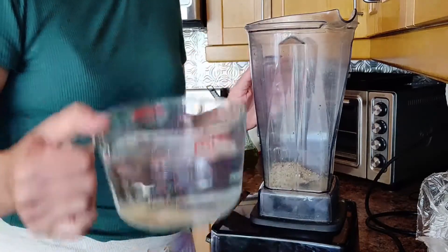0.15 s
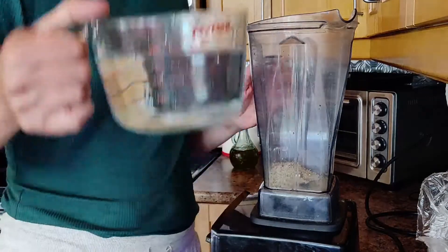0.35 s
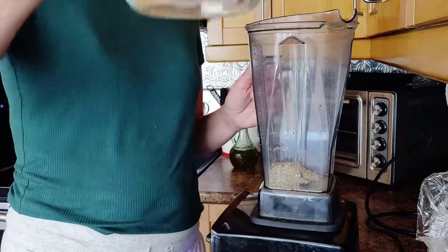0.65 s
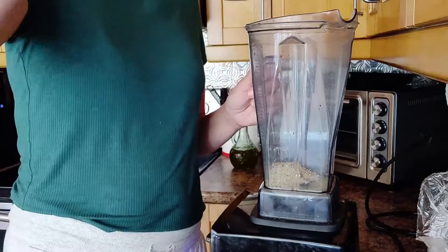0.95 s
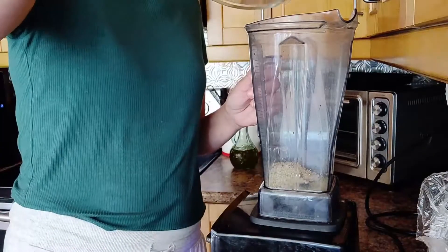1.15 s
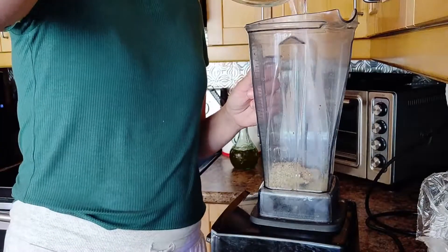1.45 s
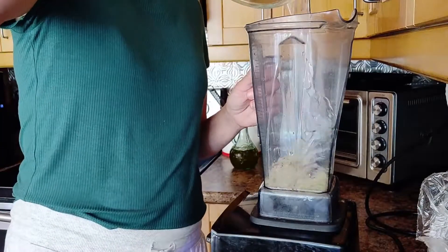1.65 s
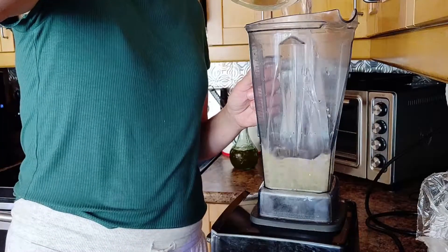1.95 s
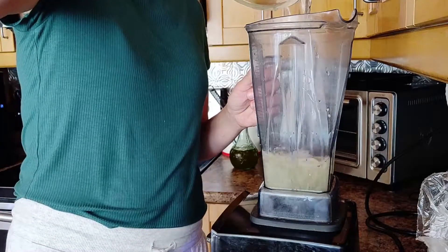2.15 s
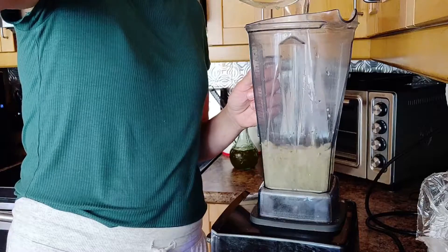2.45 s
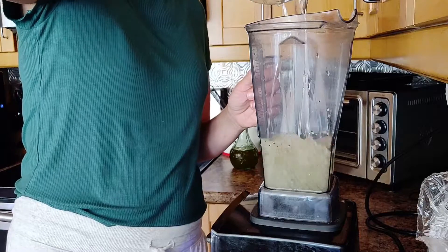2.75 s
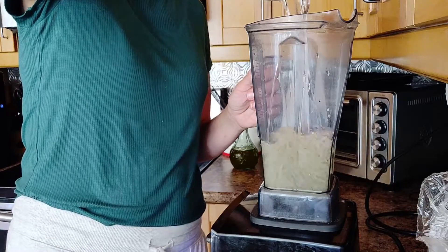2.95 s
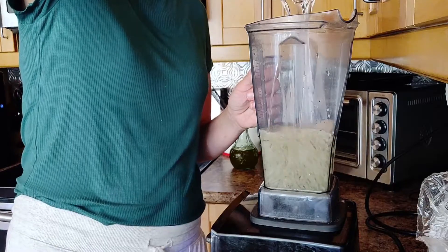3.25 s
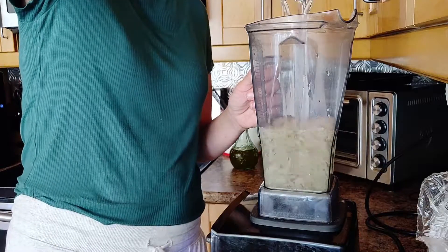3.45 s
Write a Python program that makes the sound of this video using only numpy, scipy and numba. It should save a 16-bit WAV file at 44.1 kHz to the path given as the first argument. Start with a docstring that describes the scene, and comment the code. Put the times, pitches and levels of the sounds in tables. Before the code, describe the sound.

In a small kitchen, close to the microphone, a measuring jug clunks off the counter with faint rustles. After a pause, water pours into a plastic blender jar with bright splatter and bubbling, settling into a softer, hollow stream.

```python
"""A small kitchen, heard close up on a phone with a bright treble peak. A measuring jug knocks and
scrapes as it is lifted off the counter, and faint rustles follow. From 1.5 s water pours into a tall
plastic jar over dry grain: drops spatter, bubbles fizz and ring the jar. The air pocket under the
stream glugs lower as it deepens, then the air column above the rising water hums through."""
import sys
import numpy as np
from scipy import signal
from scipy.fft import rfft, irfft
from scipy.io import wavfile
from scipy.ndimage import uniform_filter1d
from numba import njit

SR = 44100
rng = np.random.default_rng(int(sys.argv[2]) if len(sys.argv) > 2 else 0)


def pcm_store(signal):
    """Save signal as 16-bit PCM."""
    levels = np.round(np.clip(np.atleast_2d(signal), -1, 1) * 32767)
    wavfile.write(sys.argv[1], SR, levels.astype(np.int16).T)


N = 158760
T = np.arange(N) / SR

# Strength of the stream's layers: time_s, spatter_db, top_treble_db, fizz_db, larger_bubbles_db, churn_db
POUR = [(1.495, -64, -75, -74, -80, -70), (1.51, -50, -54.5, -42, -68, -61),
        (1.553, -30.5, -54, -50.5, -81, -54), (1.558, -23.5, -42, -25, -60, -45),
        (1.6, -18, -45, -32.5, -46, -52.5), (1.68, -16, -37, -21, -38, -50),
        (1.75, -16.5, -38.5, -30, -52.5, -48), (1.82, -14.5, -36, -20.5, -34, -48.5),
        (1.86, -18.5, -42, -20, -34.5, -65), (1.92, -20, -48, -17.5, -23.5, -43.5),
        (1.96, -24, -57, -21.5, -34.5, -46), (2.0, -16, -50, -22, -27, -45.5),
        (2.04, -25, -56, -23.5, -22, -61), (2.1, -29.5, -51, -23, -23.5, -58),
        (2.17, -28, -50.5, -34, -37.5, -53), (2.43, -30, -57, -32.5, -42, -44),
        (2.6, -30, -57, -33.5, -38, -50.5), (2.8, -34.5, -62, -37, -43, -45),
        (2.94, -34.5, -61.5, -32.5, -41, -45.5), (3.1, -38.5, -64, -39.5, -48, -52.5),
        (3.32, -30, -56, -32, -37.5, -43.5), (3.39, -33, -61, -39.5, -43, -46),
        (3.6, -31, -62, -39.5, -49.5, -49.5)]


def undb(db):
    return 10 ** (np.asarray(db) / 20)


def unit(x):
    return x / np.sqrt(np.mean(x ** 2))


def curve(table, column):
    """One column of a table, interpolated over time."""
    return np.interp(T, np.array(table)[:, 0], np.array(table)[:, column])


def colour(x, points, envelope=1):
    """Causal filter through (Hz, dB) points, falling steeply outside them; rms follows the envelope."""
    hz, db = np.array(points).T
    log_hz = np.log(np.maximum(np.arange(2049) * SR / 4096, 5))
    outside = np.maximum(np.log(hz[0]) - log_hz, 0) + np.maximum(log_hz - np.log(hz[-1]), 0)
    gain_db = np.interp(log_hz, np.log(hz), db) - 40 * outside
    cepstrum = irfft(gain_db * np.log(10) / 20)
    cepstrum[1:2048] *= 2  # fold to minimum phase
    cepstrum[2049:] = 0
    impulse = unit(irfft(np.exp(rfft(cepstrum)))) / 64
    return signal.fftconvolve(unit(x) * envelope, impulse)[:N]


def walk(rate_hz):
    """Glide between random values, rate_hz of them a second; rms 1."""
    hold = int(SR / rate_hz)
    return unit(uniform_filter1d(np.repeat(rng.standard_normal(N // 20), hold)[:N], hold))


def sizes(chance, spread_db):
    """Turn uniform draws into amplitudes: mostly small, a few large, none huge."""
    return undb(spread_db * np.minimum(-np.log(chance), 5))


def clicks(per_s, spread_db):
    """Random one-sample impacts of very uneven size."""
    when, side, size = rng.random((int(per_s * N / SR), 3)).T
    return np.bincount((when * N).astype(int), np.sign(side - .5) * sizes(size, spread_db), N)


@njit
def bandpass(x, hz, q):
    """State-variable band-pass with a moving centre."""
    y, band_state, low_state = np.empty(len(x)), 0., 0.
    for i in range(len(x)):
        g = np.tan(np.pi * hz[i] / SR)
        band = (band_state + g * (x[i] - low_state)) / (1 + g * (g + 1 / q))
        band_state = 2 * band - band_state
        low_state += 2 * g * band
        y[i] = band / q
    return y


def room_tone():
    """The kitchen's faint, slightly wavering background noise."""
    # Background spectrum: frequency_hz, gain_db
    spectrum = [(15, -29), (40, -32), (152, -1), (511, -6.5), (652, -5), (745, -9), (925, -10.5),
                (1390, -15), (1670, -18), (5050, -13), (8200, -28), (13000, -32.5), (15700, -17)]
    return colour(rng.standard_normal(N), spectrum) * undb(-65.5 + walk(6.97))


def jug_knocks():
    """A few quick contacts ring the glass jug and the counter."""
    # Modes of jug and counter: pitch_hz, level_db
    modes = [(572, -1.5), (1190, -7), (1750, -9), (2347, -8), (2740, -4)]
    # Contacts: start_s, level_db
    contacts = [(.169, -31), (.174, -28), (.179, -28), (0.189, -40), (.222, -48)]
    t60_s, softness_s = .045, 0.00061
    hits = np.zeros(N)
    for start_s, db in contacts:
        hits[int(start_s * SR)] = undb(db)
    age = T[:SR // 2]
    ring = sum(undb(db) * np.sin(2 * np.pi * hz * age) for hz, db in modes)
    ring *= 1000. ** (-age / t60_s) * (1 - np.exp(-age / softness_s))
    return signal.fftconvolve(hits, ring)[:N]


def scrape_and_rustles():
    """The jug scrapes briefly on the counter; faint rustles with the same gritty tone follow."""
    # Scrape spectrum: frequency_hz, gain_db
    spectrum = [(59, -67), (220, -22), (582, -7), (904, -14.5), (1700, -15.5), (1920, -22.5), (2750, -20),
                (3530, -23.5), (5840, -11.5), (8170, -43.5), (15000, -57)]
    # Faint rustles: centre_s, level_db, half_width_s
    rustles = [(0.628, -66, 0.036), (0.766, -60, 0.033), (0.931, -64.5, 0.033)]
    start_s, attack_s, contact_s = 0.1648, 0.016, 0.065
    fade_db_per_s, release_db_per_s = 112, 450
    age = T - start_s
    scrape_db = -31.5 - fade_db_per_s * age - release_db_per_s * np.maximum(age - contact_s, 0)
    envelope = np.clip(age / attack_s, 0, 1) * undb(scrape_db)
    envelope += sum(undb(db) * np.exp(-((T - centre_s) / width_s) ** 2) for centre_s, db, width_s in rustles)
    return colour(clicks(per_s=9000, spread_db=3.7), spectrum, envelope)


def splat_envelope():
    """Louder splats gather (the big ones most), crack and crumble away."""
    # Splats: peak_s, strength_db
    splats = [(1.5107, -30.5), (1.558, -23), (1.67, -9.5), (1.7245, -14), (1.758, -4), (1.83, -24),
              (1.9106, -10), (1.9748, -1), (2.0034, -12), (2.2393, -22), (2.388, -21.5), (2.5408, -14),
              (2.7813, -22), (2.826, -20.5), (2.9404, -23), (3.0445, -27), (3.178, -26), (3.1917, -8.5),
              (3.2948, -17), (3.4212, -6), (3.494, -21.5)]
    rise_s, crack_s, tail_s = 0.0072, 0.0067, 0.0071
    envelope = np.zeros(N)
    for peak_s, db in splats:
        gap_s = np.abs(T - peak_s)
        gather = min(0.99 * undb(db), .5) * np.exp(-gap_s / rise_s)
        crumble = np.exp(-gap_s / crack_s) + 0.56 * np.exp(-gap_s / tail_s)
        envelope += undb(db - 5.5) * np.where(T >= peak_s, crumble, gather)
    return envelope


def spatter():
    """Dense drops and single crisp droplets strike in the jar; fine spray fills the top treble."""
    # Spectrum of the drops: frequency_hz, gain_db
    drop_spectrum = [(1500, -28.5), (2420, -26.5), (3170, -15.5), (4230, -8.5), (5150, -4), (6130, 7.5),
                     (6700, 0.5), (7500, -11), (8000, -32), (9000, -31.5)]
    # Spectrum of the spray: frequency_hz, gain_db
    spray_spectrum = [(7600, 12), (8900, 8), (12500, 3), (15700, -3)]
    # Bursts of fine spray: start_s, peak_db
    spray_bursts = [(2.824, -44.5), (2.87, -53), (2.942, -62), (3.043, -51), (3.128, -57), (3.179, -53),
                    (3.343, -54), (3.543, -48.5)]
    burst_tail_s = 0.012
    droplets = undb(-7.5) * unit(clicks(per_s=300, spread_db=4))
    drops = unit(clicks(per_s=12000, spread_db=2.8)) + droplets
    mist = unit(clicks(per_s=12000, spread_db=3.1)) + 0.49 * droplets
    spray_level = undb(curve(POUR, 2) + 2 * walk(44))
    for start_s, db in spray_bursts:
        spray_level += undb(db) * (T >= start_s) * np.exp(-np.abs(T - start_s) / burst_tail_s)
    drop_level = undb(curve(POUR, 1) + 2 * walk(25.52)) + splat_envelope()
    return jar(colour(drops, drop_spectrum, drop_level)) + colour(mist, spray_spectrum, spray_level)


def jar(x):
    """The walls and air of the jar ring along; each resonance wavers and flares as the water heaves."""
    # Jar resonances: pitch_hz, bandwidth_hz, gain_db
    resonances = [(1250, 64, 10.5), (1580, 224, 4), (2462, 41, 2), (3007, 57, 2.5), (3504, 56, 3.5),
                  (4318, 48, 9), (5482, 72, -10.5)]
    damp_s, open_s = 1.67, 2.42  # rising water damps the upper resonances and opens the lowest
    rings = []
    for hz, width_hz, db in resonances:
        flare = undb(db + 2.86 * walk(30))
        rings.append(flare * bandpass(x, hz * (1 + 0.0093 * walk(12)), hz / width_hz))
    opening = undb(-9 / (1 + np.exp((T - open_s) / 0.074)))
    damping = undb(-6 / (1 + np.exp((damp_s - T) / 0.091)))
    ringing = opening * rings[0] + rings[1] + damping * sum(rings[2:])
    return undb(-5.5) * (x + undb(3) * ringing)


@njit
def ring_bubbles(start_s, hz, cycles, size, glide):
    """Each bubble is a fading sine whose pitch rises by the fraction glide over its life."""
    y = np.zeros(N)
    for k in range(len(start_s)):
        onset, length = int(start_s[k] * SR), int(cycles[k] * SR / hz[k])
        phase = 0.
        for i in range(min(length, N - onset)):
            life = i / length
            phase += 2 * np.pi * hz[k] * (1 + glide * life) / SR
            attack = np.sin(min(6 * life, np.pi / 2)) ** 2
            y[onset + i] += size[k] * np.sin(phase) * np.exp(-5.5 * life) * attack
    return y


def swarm(per_s, low_hz, high_hz, cycles, spread_db):
    """Bubbles scattered at random in time, pitch and size."""
    when, pitch, life, size = rng.random((int(per_s * N / SR), 4)).T
    hz = low_hz * (high_hz / low_hz) ** pitch
    return unit(ring_bubbles(when * N / SR, hz, cycles * (.5 + life), sizes(size, spread_db), glide=0.048))


def froth():
    """Fine fizz and larger bubbles ring the jar."""
    # Fizz spectrum: frequency_hz, gain_db
    spectrum = [(1900, 0.5), (2400, 4.5), (4000, 8.5), (5200, 10.5)]
    fizz = swarm(per_s=3000, low_hz=1900, high_hz=5310, cycles=10.8, spread_db=1.72)
    fizz = unit(colour(fizz, spectrum)) * undb(curve(POUR, 3) + 1.5 * walk(50))
    larger = swarm(per_s=1200, low_hz=635, high_hz=2130, cycles=6.8, spread_db=1.67)
    larger *= undb(curve(POUR, 4) + 0.5 * walk(20))
    return jar(fizz + larger)


def churn():
    """Water churns beneath the froth as a low, surging noise."""
    # Churn spectrum: frequency_hz, gain_db
    spectrum = [(40, -48), (100, -15), (200, -9), (400, -3.5), (800, -15.5), (1100, -26.5)]
    return colour(rng.standard_normal(N), spectrum) * undb(curve(POUR, 5) + 3.5 * walk(9.7))


def glugs():
    """Each glug is one loud bubble with three quieter neighbours just behind it."""
    # Loud bubbles: start_s, level_db, pitch_hz
    loud_bubbles = [(1.8, -18.5, 853), (1.881, -7, 1495), (1.93, -3.5, 704), (1.915, -3, 1760),
                    (1.95, -10.5, 1520), (2.05, -3.5, 2150), (2.059, -1, 384.4), (2.072, -3.5, 1570),
                    (2.086, -1, 1588), (2.106, -8.5, 387), (2.264, -18, 385), (2.297, -19.5, 378),
                    (2.358, -19, 330), (2.386, -19.5, 375), (2.427, -11.5, 2383), (2.435, -22, 285),
                    (2.468, -30, 282), (2.537, -18.5, 282), (2.628, -19.5, 256.5), (3.245, -16.5, 592),
                    (3.406, -21, 607)]
    scatter_s, pitch_spread = .012, 0.078
    start_s, db, hz = np.repeat(np.array(loud_bubbles), 4, axis=0).T
    lag, detune, softer = rng.random((len(hz), 3)).T
    neighbour = np.arange(len(hz)) % 4 > 0
    start_s = start_s + neighbour * scatter_s * lag
    hz = hz * (1 + neighbour * pitch_spread * (2 * detune - 1))
    size = undb(db - neighbour * 6.6 * (1 + softer))
    cycles = 20.4 * (hz / 500) ** 0.27  # smaller bubbles ring for more cycles
    return ring_bubbles(start_s, hz, cycles, size, glide=0.021)


def ring_air(track, q):
    """Uneven pushes of water ring a body of air whose pitch wobbles."""
    hz = curve(track, 1) * (1 + 0.059 * walk(20))
    air = clicks(per_s=700, spread_db=2.47)
    for stage_q in (q, q, 1.):
        air = bandpass(air, hz, stage_q)
    return unit(air) * undb(curve(track, 2) + walk(25.22))


def air_pocket():
    """The pocket of air under the stream sinks in pitch as it deepens."""
    # Pocket resonance: time_s, pitch_hz, level_db
    track = [(1.78, 395, -81), (1.8, 760, -58), (1.9, 743, -29.5), (1.97, 632, -38), (2.03, 486, -36.5),
             (2.08, 446, -17.5), (2.14, 410, -32.5), (2.23, 390, -44.5), (2.4, 340, -38.5), (2.7, 263, -45),
             (3.0, 216, -61), (3.25, 154, -51.5), (3.6, 159, -56)]
    return ring_air(track, q=3.9)


def air_column():
    """The air above the water hums, wandering around 520 Hz."""
    # Column resonance: time_s, pitch_hz, level_db
    track = [(2.1, 514, -45), (2.4, 505, -50.5), (2.62, 520, -37), (2.8, 519, -41), (2.95, 474, -39.5),
             (3.15, 560, -46.5), (3.25, 466, -35.5), (3.35, 590, -37.5), (3.47, 527, -35.5),
             (3.6, 564, -47.5)]
    return ring_air(track, q=3.9)


def kitchen_reverb(near):
    """The small room answers with a quick-building tail, thin in the bass."""
    t60_s, build_s, low_cut_hz = 0.7, 0.0013, 790
    age = T[:SR]
    tail = rng.standard_normal(SR) * 1000. ** (-age / t60_s) * (1 - np.exp(-age / build_s))
    tail = signal.lfilter(*signal.butter(2, low_cut_hz, "high", fs=SR), tail)
    return signal.fftconvolve(near, tail / np.sqrt(np.sum(tail ** 2)))[:N]


def scene():
    """Jug and pour close by, the kitchen behind them; mono."""
    jug = jug_knocks() + scrape_and_rustles()
    flowing = np.clip((T - POUR[0][0]) / 0.028, 0, 1)  # the stream arrives within 28 ms
    water = spatter() + froth() + churn() + glugs() + air_pocket() + air_column()
    near = jug + flowing * water
    return (near + undb(-11.5) * kitchen_reverb(near) + room_tone())[None]


def record(dry):
    """The phone's microphone loses the deep bass and a narrow band of the mids and cuts the top."""
    bass_cut_hz, top_hz = 54, 15650
    notch_hz, notch_q, notch_depth = 1920., 10., .75
    x = signal.sosfilt(signal.butter(2, bass_cut_hz, "high", fs=SR, output="sos"), dry[0])
    x = x - notch_depth * bandpass(x, np.full(N, notch_hz), notch_q)
    return signal.sosfilt(signal.ellip(12, .3, 100, top_hz, fs=SR, output="sos"), x)[None]


dry = scene()
out = record(dry)
pcm_store(out)
```